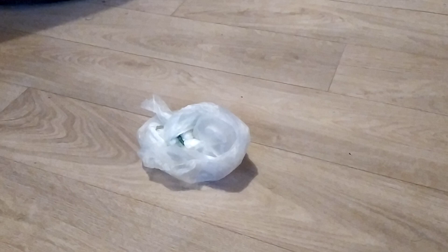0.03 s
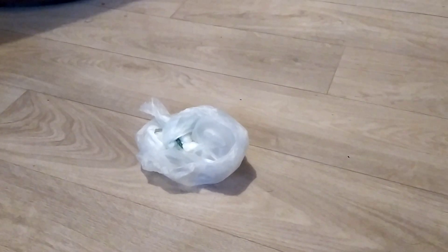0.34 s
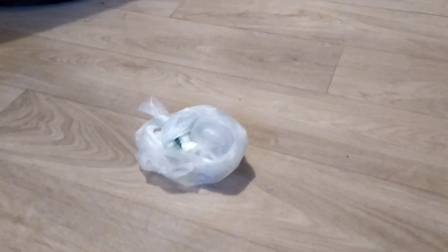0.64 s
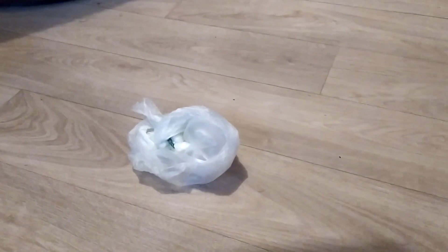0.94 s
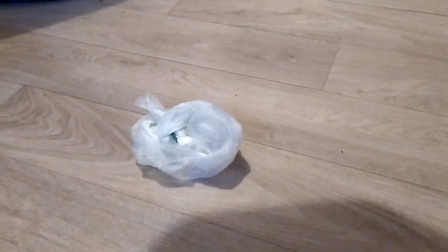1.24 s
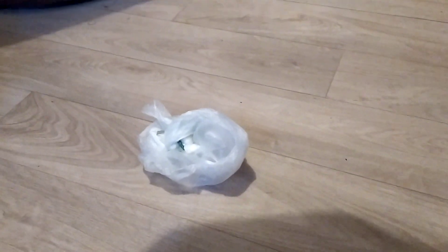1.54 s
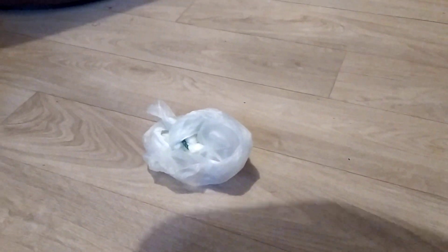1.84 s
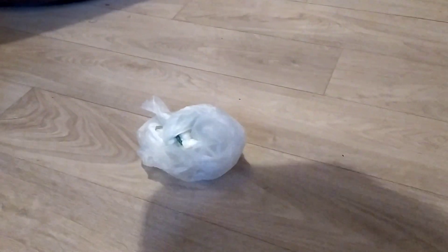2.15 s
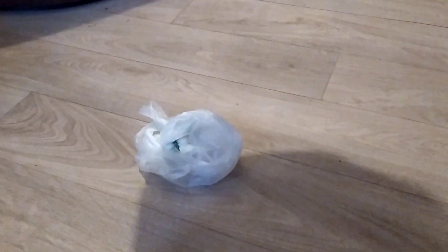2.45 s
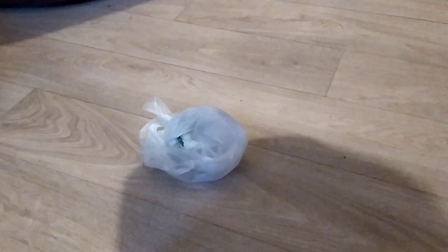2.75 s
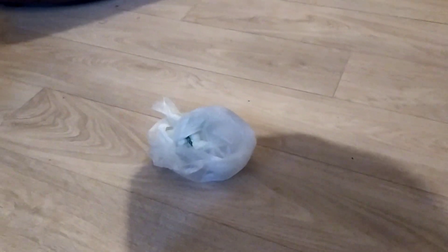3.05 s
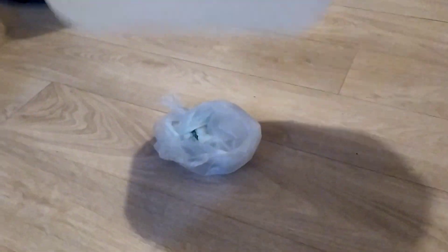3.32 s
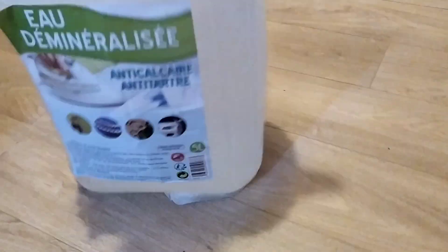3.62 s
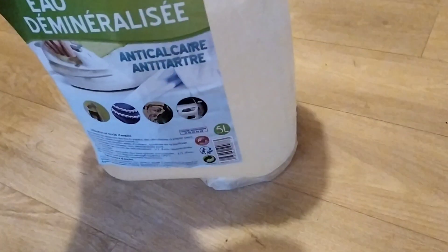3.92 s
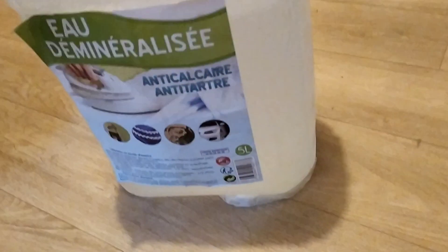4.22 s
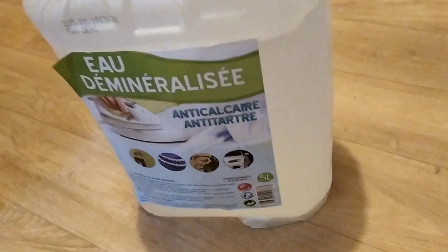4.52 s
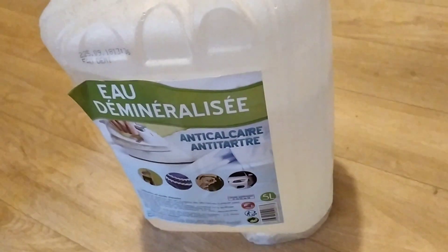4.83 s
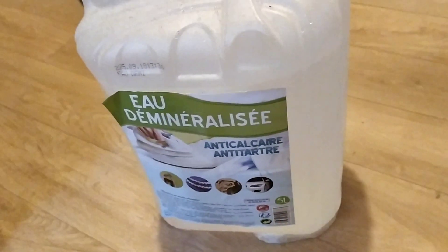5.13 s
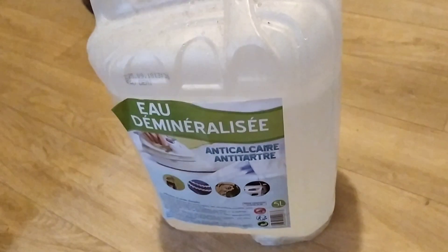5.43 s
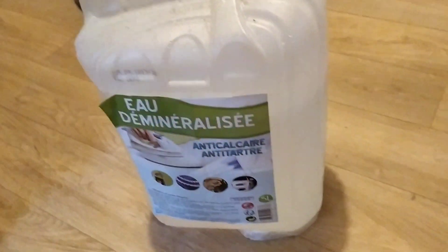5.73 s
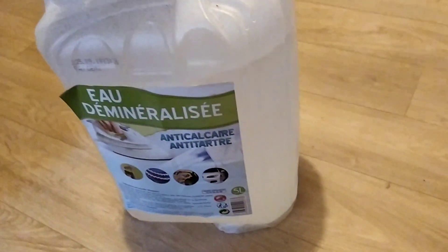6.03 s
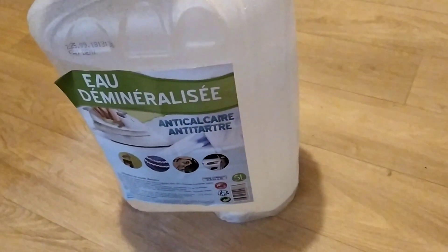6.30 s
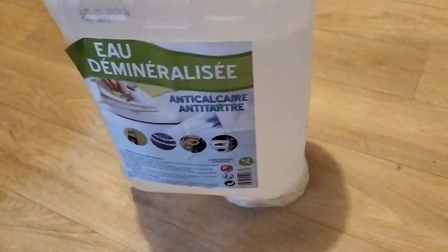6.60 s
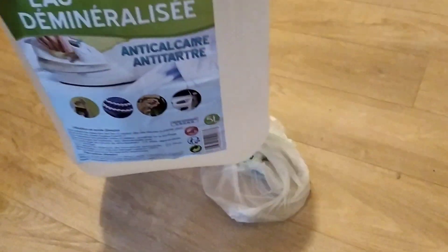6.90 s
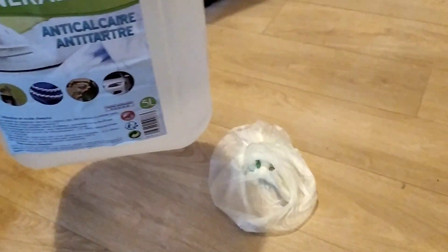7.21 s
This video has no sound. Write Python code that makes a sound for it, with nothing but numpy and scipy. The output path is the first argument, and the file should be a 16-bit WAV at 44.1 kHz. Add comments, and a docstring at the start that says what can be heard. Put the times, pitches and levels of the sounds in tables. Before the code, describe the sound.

A plastic bag pops loudly under a heavy jug in a small room, followed by low thuds, faint crinkling and dull ticks.

```python
"""Bursting a bag under a water jug

A heavy plastic jug of water comes down on a knotted, air-filled plastic bag on the floor of a small room.
The film tears, and the sudden release of pressure excites the room in a bang that drives the limiter.
The jug thuds down; friction and buckling make the flat bag rustle and snap as the jug is rocked and
lifted off. A faint hum lies underneath."""
import sys
import numpy as np
from scipy import signal
from scipy.fft import rfft, irfft, next_fast_len
from scipy.io import wavfile
from scipy.ndimage import uniform_filter1d, minimum_filter1d, map_coordinates

SR = 44100
rng = np.random.default_rng(int(sys.argv[2]) if len(sys.argv) > 2 else 0)


def master(y):
    """Save y as 16-bit WAV."""
    cut = np.clip(np.atleast_2d(y).T, -1, 1)
    pcm = np.round(cut * 32767)  # scale
    wavfile.write(sys.argv[1], SR, pcm.astype(np.int16))


N = 320166


def amp(db):
    """Amplitude ratio of a level in decibels."""
    return 10 ** (np.asarray(db) / 20)


def unit(x):
    """Normalisation to rms 1."""
    return x / np.sqrt(np.mean(x ** 2) + 1e-20)


def along(points, hz):
    """Interpolation of (frequency, value) points on a logarithmic frequency axis."""
    f, v = np.transpose(points)
    return np.interp(np.log(hz + 1), np.log(f + 1), v)


def clock(size):
    """Sample times in seconds."""
    return np.arange(size) / SR


def fade(t, t60):
    """Exponential decay: 60 dB in t60 seconds."""
    return np.exp(-np.log(1000) * np.maximum(t, 0) / np.maximum(t60, 1e-4))


def swell(s, rise_t60, fall_t60):
    """Exponential growth to a peak at time s, then decay: returns start time and envelope."""
    start = max(s - rise_t60, 0)
    t = start + clock(round((rise_t60 + fall_t60) * SR))
    return start, fade(s - t, rise_t60) * fade(t - s, fall_t60)


def wobble(rate, size=N):
    """Smooth random modulation through rate knots a second."""
    return map_coordinates(rng.standard_normal(int(size * rate / SR) + 4), [clock(size) * rate])


def filtered(x, response):
    """Linear filtering: the spectrum of x times a frequency response."""
    size = x.shape[-1]
    m = next_fast_len(size + SR // 4)
    return irfft(rfft(x, m) * response(np.fft.rfftfreq(m, 1 / SR)), m)[..., :size]


def resonance(f, hz, width_hz):
    """Band-pass response of a damped oscillator tuned to hz."""
    return 1j * f * width_hz / (hz * hz - f * f + 1j * f * width_hz)


def add(track, s, sound):
    """Superposition of a sound on a track at time s."""
    start = round(s * SR)
    track[:, start:start + sound.shape[-1]] += sound[..., :N - start]


# Left-right coherence of the room's field: (frequency [Hz], coherence [0-1])
COHERENCE = [(60, 0.69), (250, .9), (640, 0.68), (1400, 0.027), (15000, 0.014)]
def spread(pair, spectrum):
    """Partial coherence: two independent signals blend into coloured stereo, alike at long wavelengths."""
    turn = lambda hz: np.arccos(np.clip(along(COHERENCE, hz), -1, 1)) / 2
    mid, side = filtered(pair, lambda hz: amp(along(spectrum, hz)) * [np.cos(turn(hz)), np.sin(turn(hz))])
    return unit(np.array([mid + side, mid - side]))


def noise(spectrum, size):
    """Spectrally shaped Gaussian noise, stereo, of rms 1."""
    return spread(rng.standard_normal((2, size)), spectrum)


# Ambient noise: (frequency [Hz], relative spectral density [dB])
AIR_SPECTRUM = [(15, -47.5), (25, -9), (104, -2.5), (144, -10), (183, -5), (215, -5.5), (253, -20.5),
                (297, -1.5), (322, -11.5), (389, -12.5), (552, -18.5), (614, -17.5), (970, -25.5),
                (12500, -32), (15500, -32.5)]
# Partials of the hum: (frequency [Hz], level [dB])
HUM_PARTIALS = [(118.4, -76.5), (177.6, -75.5), (209.9, -74), (296.1, -70), (387.6, -78.5)]
def background(air_db=-64.0, hum_db=-1.5):
    """Noise floor: broadband room air and a hum slowly modulated in amplitude and phase."""
    t = clock(N)
    hum = sum(amp(db + 2.5 * wobble(2.5)) * np.sin(2 * np.pi * hz * t + 1.4 * wobble(1.5))
              for hz, db in HUM_PARTIALS)
    return amp(air_db + 0.36 * wobble(20.0)) * noise(AIR_SPECTRUM, N) + amp(hum_db) * hum


# Low thumps, a soft handling bump at the start and then the jug thudding on the floor:
# (time [s], level [dB], relative clap level [dB])
LOW_THUMPS = [(0.363, -60, -28), (3.571, -12.5, -5), (3.61, -20, -26), (3.684, -14.5, -18),
              (3.715, -12.5, -12.5), (3.759, -29, -26), (3.889, -47, -11), (4.339, -46.5, -16),
              (4.384, -48, -16), (5.63, -48.5, -20), (5.819, -51, -9)]
# Their rumble and the clap of the contact: (frequency [Hz], relative spectral density [dB])
THUD_SPECTRUM = [(40, -22), (60, -9), (100, -3.5), (140, -0.5), (200, -2.5), (260, 5), (320, -9), (380, -8),
                 (600, -21.5), (1200, -60.5)]
CLAP_SPECTRUM = [(250, -19.5), (430, 2.5), (650, -6), (880, 2.5), (1150, 0.5), (1500, -17.5), (3000, -33.5),
                 (6000, -59)]
def thuds(thump_hz=204, db_per_octave=27):
    """Impact: each bump thumps, rumbles and claps; a harder one is a shorter contact and thumps higher."""
    out, t = np.zeros((2, N)), clock(SR // 2)
    attack = 1 - np.exp(-t / 0.0024)
    for s, db, clap_db in LOW_THUMPS:
        hz = thump_hz * 2 ** (db / db_per_octave)
        thump = amp(-5) * np.sin(2 * np.pi * hz * t) * fade(t, t60=0.11)
        rumble = amp(-10) * noise(THUD_SPECTRUM, len(t)) * fade(t, t60=0.22)
        clap = amp(clap_db + 1) * noise(CLAP_SPECTRUM, len(t)) * fade(t, t60=0.12)
        add(out, s, amp(db) * (thump + rumble + clap) * attack)
    return out


# A distant scuff: (frequency [Hz], relative spectral density [dB])
SCUFF_SPECTRUM = [(500, -8), (1200, -4), (1900, 4), (3000, -11), (7000, -16), (14000, -28)]
def scuff(s=1.22, db=-73):
    """Sliding friction: a soft brush of noise as someone steps up with the jug."""
    out = np.zeros((2, N))
    start, envelope = swell(s, rise_t60=0.13, fall_t60=0.9)
    add(out, start, amp(db) * envelope * noise(SCUFF_SPECTRUM, len(envelope)))
    return out


def grains(size, rate, scatter_db, hiss):
    """Shot noise: tiny slips of random size, on average rate a second, over a bed of hiss."""
    occurs = rng.random(size) < rate / SR
    slips = occurs * amp(scatter_db * np.minimum(rng.standard_normal(size), 2))
    return unit(slips * rng.standard_normal((2, size))) + hiss * rng.standard_normal((2, size))


# Crinkling and rubbing of the film: (frequency [Hz], relative spectral density [dB])
CRINKLE_SPECTRUM = [(1500, -28), (3000, -7), (4500, 1), (5800, 3.5), (7300, -1), (9700, 1.5), (13500, -1),
                    (15800, -5.5)]
RUB_SPECTRUM = [(100, -12.5), (300, 2), (700, -0.5), (1500, -1.5), (2500, -2.5), (3500, -7.5), (6000, -25)]
def rustle(size, rub_db, tilt_db, clump_db=0.85):
    """Stick-slip of film: clumps of bright crinkles, tilted by tilt_db per octave, over a dull rub."""
    colour = [(hz, db + tilt_db * np.log2(hz / 8000)) for hz, db in CRINKLE_SPECTRUM]
    clumps = unit(amp(clump_db * wobble(200, size)))
    crinkle = clumps * spread(grains(size, rate=2600, scatter_db=4.0, hiss=1), colour)
    rub = spread(grains(size, rate=1200, scatter_db=3.5, hiss=1.8), RUB_SPECTRUM)
    return crinkle + amp(rub_db) * rub


# Pushes on the film, from first touch to lift-off:
# (peak time [s], level [dB], rise t60 [s], fall t60 [s], rub re crinkle [dB])
FILM_STROKES = [(3.321, -45.5, .12, 0.099, -3), (3.401, -61.5, 0.033, 0.71, -9),
                (3.791, -52, 0.065, 0.13, -14.5), (3.812, -43, .04, 0.075, 1.5),
                (3.928, -46.5, .15, .15, 2), (4.11, -58.5, 0.31, 0.75, -4), (4.346, -56, .12, .15, -1.5),
                (4.55, -61, 1.17, 0.73, -1), (5.0, -69, 0.43, .3, -5), (5.135, -64, .04, .15, -5),
                (5.3, -69.5, 1.1, 1.95, -1), (5.584, -53.5, 0.026, .35, -6), (5.648, -50.5, .3, .25, -3.5),
                (5.8, -67, 1.2, 2.1, -1.5), (6.266, -64.5, .08, 0.26, 1.5), (6.655, -63.5, .05, 0.09, 0),
                (6.67, -62.5, 0.82, 1.2, -8.5)]
def strokes():
    """Frictional drag: each push of the jug pulls the film along, and its rustle swells and dies."""
    out = np.zeros((2, N))
    for s, db, rise_t60, fall_t60, rub_db in FILM_STROKES:
        start, envelope = swell(s, rise_t60, fall_t60)
        add(out, start, amp(db) * envelope * rustle(len(envelope), rub_db, tilt_db=0.1 + 0.01 * rub_db))
    return out


# The jug bears down or rolls: (peak time [s], level [dB], rise t60 [s], fall t60 [s])
JUG_ROLLS = [(3.39, -58.5, 0.59, .8), (3.93, -54, 0.32, 1.1), (4.3, -57.5, .15, .4),
             (4.42, -58.5, 0.48, 1.6), (5.42, -61.5, 1.4, 0.54), (5.588, -51.5, 0.31, .15),
             (5.645, -46, .12, .35), (5.831, -57.5, 0.19, .8)]
# The floor beneath it: (frequency [Hz], relative spectral density [dB])
RUMBLE_SPECTRUM = [(25, -7.5), (50, 0.5), (80, 1), (130, -3.5), (220, -11.5), (500, -45)]
def roll():
    """Rolling contact: the jug tips over its bottom edge and drives a low rumble in the floor."""
    out = np.zeros((2, N))
    for s, db, rise_t60, fall_t60 in JUG_ROLLS:
        start, envelope = swell(s, rise_t60, fall_t60)
        add(out, start, amp(db) * envelope * noise(RUMBLE_SPECTRUM, len(envelope)))
    return out


def clicks(events, relative_width, t60, gain_db):
    """Buckling of plastic: a sharp crack and brief chatter excite one resonance."""
    out, t = np.zeros((2, N)), clock(SR // 20)
    for s, db, hz in events:
        chatter = rng.standard_normal((2, len(t))) * (fade(t, t60) + 1.8 * fade(t, t60=0.0033))
        click = filtered(chatter, lambda f: resonance(f, hz, hz * relative_width))
        peak = np.abs(click.mean(axis=0)).max()
        add(out, s, amp(db + gain_db) * click / peak)
    return out


# Creases snapping: (time [s], level [dB], resonance [Hz])
CREASE_SNAPS = [(3.3905, -39, 6800), (3.9399, -35, 8300), (4.0432, -45, 4160), (4.0574, -43, 11570),
                (4.0714, -52, 7800), (4.0886, -38, 5800), (4.1041, -42, 9000), (4.335, -43, 9000),
                (4.3436, -44, 5700), (4.3504, -47, 5800), (4.6563, -41.5, 7510), (5.3804, -51, 9400),
                (5.4326, -55, 11850), (5.8206, -38, 5320), (5.8284, -47, 5000)]
def snapping(low_cut_hz=2600):
    """Snap-through: creases flip in a film too thin to radiate low frequencies."""
    snaps = clicks(CREASE_SNAPS + settling(), relative_width=0.7, t60=0.016, gain_db=2.5)
    return signal.sosfilt(signal.butter(2, low_cut_hz, "highpass", fs=SR, output="sos"), snaps)


# Ticks of the jug's walls: (time [s], level [dB], resonance [Hz])
WALL_TICKS = [(3.448, -43, 770), (3.458, -45, 2200), (3.801, -24, 2510), (3.996, -38, 1280),
              (4.043, -41.5, 2100), (4.191, -48.5, 1650), (5.13, -51.5, 1495), (5.299, -54, 964),
              (5.363, -53, 850), (5.434, -45, 760), (5.518, -46, 746), (5.577, -47, 755),
              (5.632, -46.5, 897), (5.819, -47.5, 1187), (5.884, -50, 1984), (5.911, -47, 998),
              (5.945, -43.5, 1600), (6.007, -42.5, 1776), (6.213, -50.5, 750)]
def ticking(body_hz=610, high_cut_hz=3300):
    """Flexure of thick walls: each dull tick excites its own resonance and, more faintly, the body's."""
    ticks = WALL_TICKS + flexing()
    knocks = [(s, db, body_hz) for s, db, hz in ticks]
    walls = clicks(ticks, relative_width=0.45, t60=0.026, gain_db=-1.0)
    body = clicks(knocks, relative_width=0.31, t60=0.035, gain_db=-9)
    return signal.sosfilt(signal.butter(6, high_cut_hz, fs=SR, output="sos"), walls + body)


# Reverberation time of the room: (frequency [Hz], t60 [s])
ROOM_T60 = [(60, 0.28), (240, 0.64), (700, 0.35), (2000, 0.33), (6000, .28), (14000, 0.25)]
def die_away(x):
    """Absorption: each frequency decays with its own reverberation time."""
    hz, t, spectra = signal.stft(x, SR, nperseg=512)
    decay = fade(t, along(ROOM_T60, hz)[:, None])
    return signal.istft(spectra * decay, SR, nperseg=512)[1][:, :x.shape[-1]]


def reverberate(x, wet_db, delay_s=0.0048):
    """Reverberation: the direct sound plus its convolution with a delayed, diffuse tail."""
    tail = die_away(rng.standard_normal((2, SR // 2)))
    tail = np.pad(tail / np.linalg.norm(tail[0]), ((0, 0), (round(delay_s * SR), 0)))
    return x + amp(wet_db) * signal.fftconvolve(x, tail, axes=1)[:, :N]


# Diffuse field of the bang: (frequency [Hz], relative spectral density [dB])
BANG_SPECTRUM = [(35, -30.5), (60, -1.5), (242, -0.5), (312, -4), (546, -7), (999, -4.5), (1200, -14.5),
                 (1350, -3.5), (1590, -9), (2250, -3.5), (3840, -12), (5450, -12.5), (8280, -15.5),
                 (12600, -14), (15500, -25)]
# Narrow ringing peaks that colour the bang: (frequency [Hz], bandwidth [Hz], relative level [dB])
BANG_PEAKS = [(1335, 33, -2.5), (1714, 130, -3), (2240, 59, -0.5), (2844, 29, 4), (3250, 140, -3.5),
              (4215, 39, -5), (4570, 61, -6.5), (4760, 75, -3), (4640, 22, -9), (5624, 110, -5),
              (6180, 52, -5), (6610, 36, -9.5), (6900, 50, -10), (7000, 32, -13.5), (7930, 34, -9.5),
              (8140, 76, -12), (9170, 48, -11.5), (8900, 25, -8), (9900, 27, -11), (9880, 120, -9),
              (11160, 91, -8), (10600, 89, -17), (10720, 41, -11.5), (12100, 91, -11.5),
              (12700, 610, -12.5), (13500, 37, -13), (13500, 110, -12.5), (13700, 43, -14)]
# Low modes of floor and room: (frequency [Hz], relative level [dB])
ROOM_MODES = [(53.8, -27), (86.1, -31), (118.4, -30.5), (172.3, -31), (247.6, -32.5), (360.7, -36.5),
              (414.5, -43.5), (468.3, -45), (559.9, -45), (602.9, -45.5)]
def burst(s=3.5075, shock_hz=1000, boom_s=0.51):
    """Impulsive excitation: the film rips, the air leaves in one shock, and the room rings."""
    out, t = np.zeros((2, N)), clock(SR)
    # the rip grows louder until the bag gives way
    lead = clock(SR // 40)
    rip = noise([(200, -13.0), (700, 2), (3000, -1.5), (7000, 2), (15000, -0.5)], len(lead))
    add(out, s - lead[-1], amp(-14) * rip * fade(lead[-1] - lead, t60=0.04))
    # the freed air overshoots and swings for a few cycles
    add(out, s, -amp(2) * np.sin(2 * np.pi * shock_hz * t) * fade(t, t60=0.0073))
    # echoes crowd in, coloured by narrow peaks; the bass is left to the low modes
    echoes = filtered(noise(BANG_SPECTRUM, SR), lambda hz: hz ** 2 / (hz ** 2 + 150 ** 2))
    peaks = lambda f: sum(amp(db) * resonance(f, hz, width) for hz, width, db in BANG_PEAKS)
    ringing = unit(filtered(rng.standard_normal((2, SR)), peaks))
    bang = die_away(amp(-4.5) * echoes + amp(-8.5) * ringing)
    add(out, s, bang * (1 - np.exp(-t / 0.00043)))
    # floor and room boom, damped ever harder as the jug settles
    modes = sum(amp(db) * np.sin(2 * np.pi * (hz * t + rng.random())) for hz, db in ROOM_MODES)
    boom = amp(-21) * unit(modes) * fade(t * t / boom_s, boom_s)
    add(out, s, boom * (1 - np.exp(-t / 0.0065)))
    return out


def crush(s=3.68, db=-31, uneven_db=2.0):
    """Crumpling: the jug flattens the torn bag, easing off in fits as the air runs out."""
    out = np.zeros((2, N))
    start, envelope = swell(s, rise_t60=0.11, fall_t60=0.64)
    gain = amp(db + uneven_db * wobble(45, len(envelope))) * envelope
    add(out, start, gain * rustle(len(gain), rub_db=-6, tilt_db=0.2, clump_db=2.0))
    return out


def settling(count=26, from_s=3.68, span_s=0.91, db=-22.5, fall_db_per_s=51, spread_db=9, hz=6560):
    """Stress relaxation: creases let go ever more faintly, as (time [s], level [dB], resonance [Hz])."""
    return [(from_s + when * span_s,
             db - fall_db_per_s * when * span_s - weak * spread_db,
             hz * 2 ** (2 * pitch - 1)) for when, weak, pitch in rng.random((count, 3))]


def creep(from_s=4.0, db=-75, uneven_db=2.5):
    """Creep: the crumpled film never lies quite still and keeps up a faint rustle."""
    gain = (clock(N) > from_s) * amp(db + uneven_db * wobble(6.1))
    return gain * rustle(N, rub_db=-5, tilt_db=-0.5)


def flexing(count=30, from_s=4.1, to_s=6.4, db=-56, spread_db=17.5, hz=1160):
    """Flexure under rocking: faint random wall ticks, as (time [s], level [dB], resonance [Hz])."""
    return [(from_s + when * (to_s - from_s), db - weak * spread_db, hz * 2 ** (pitch - 0.5))
            for when, weak, pitch in rng.random((count, 3))]


# Skids on taut film: (peak time [s], level [dB], rise t60 [s], fall t60 [s])
JUG_SKIDS = [(5.76, -65.5, 0.45, 1.3), (6.045, -50.5, .3, 0.25), (6.192, -53, .4, .22),
             (6.266, -54.5, 0.064, .24)]
# Their hiss: (frequency [Hz], relative spectral density [dB])
SKID_SPECTRUM = [(880, -36.5), (1500, -7.5), (1740, -18), (2520, -7.5), (3990, -10.5), (4490, -2),
                 (5620, 1), (8160, -4), (9820, -2), (15600, -2)]
def skids(uneven_db=1.6):
    """Sliding friction: taut film slips under the jug in steps so fine that they merge into hiss."""
    out = np.zeros((2, N))
    for s, db, rise_t60, fall_t60 in JUG_SKIDS:
        start, envelope = swell(s, rise_t60, fall_t60)
        gain = amp(db + uneven_db * wobble(160, len(envelope))) * envelope
        add(out, start, gain * noise(SKID_SPECTRUM, len(gain)))
    return out


# Stereo balance of the action: (frequency [Hz], left re right [dB])
BALANCE = [(60, -0.5), (400, -1), (1100, 0.5), (2400, 1.5), (5000, 4), (8000, -0.04), (10500, 3),
           (14500, 7.5)]
def scene(film_pan_db=1.0):
    """Superposition: burst, jug and film sound over the room's noise floor."""
    sides = np.array([[0.5], [-0.5]])
    buckling = reverberate(snapping() + ticking(), wet_db=-12.5)
    film = (strokes() + crush() + skids() + creep()) * amp(film_pan_db * sides)
    rustling = reverberate(film, wet_db=-12.0)
    action = burst() + thuds() + roll() + scuff() + buckling + rustling
    return filtered(action, lambda hz: amp(along(BALANCE, hz) * sides)) + background()


def record(dry, ceiling=1.0, bass_cut_hz=40, top_hz=15950):
    """Band and peak limiting: a fade-in, bass cut, soft saturation, limiter and steep treble cut."""
    opened = dry * np.clip((clock(N) - 0.09) / 0.19, 0, 1)
    thinned = signal.sosfilt(signal.butter(4, bass_cut_hz, "highpass", fs=SR, output="sos"), opened)
    rounded = 1.358 * np.tanh(thinned / 1.226)
    needed_gain = np.minimum(1, ceiling / (np.abs(rounded).max(axis=0) + 1e-9))
    gain = uniform_filter1d(minimum_filter1d(needed_gain, size=130), size=130)
    return filtered(rounded * gain, lambda hz: np.clip((top_hz - hz) / 450, 0, 1))


dry = scene()
out = record(dry)
master(out)
```